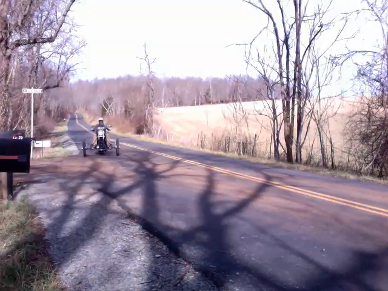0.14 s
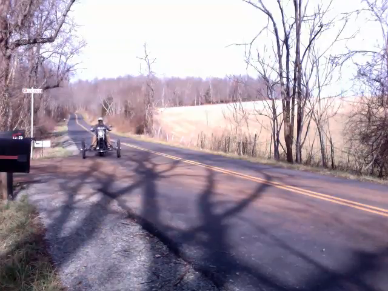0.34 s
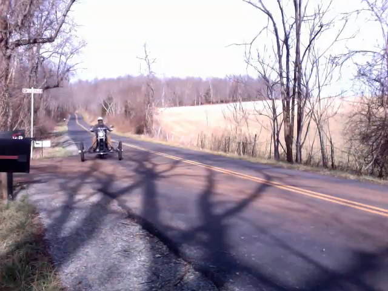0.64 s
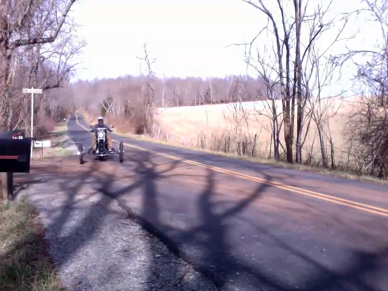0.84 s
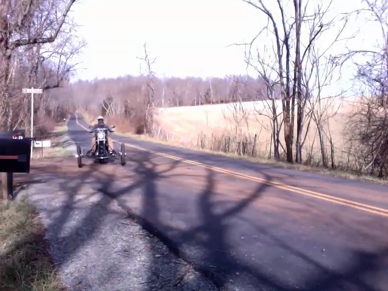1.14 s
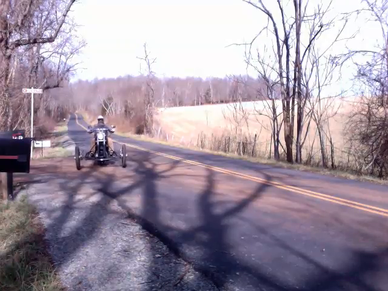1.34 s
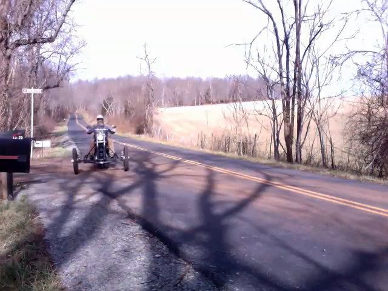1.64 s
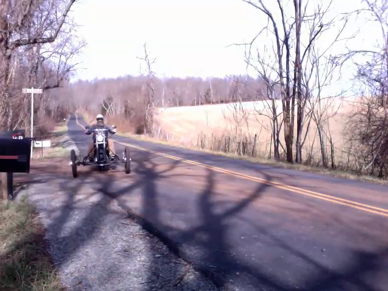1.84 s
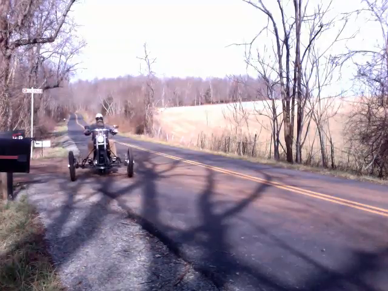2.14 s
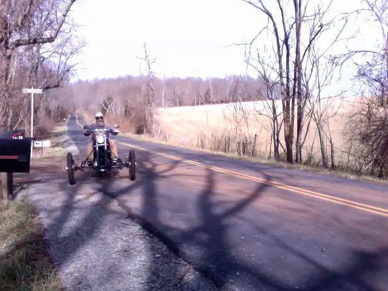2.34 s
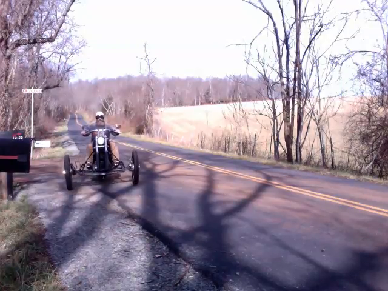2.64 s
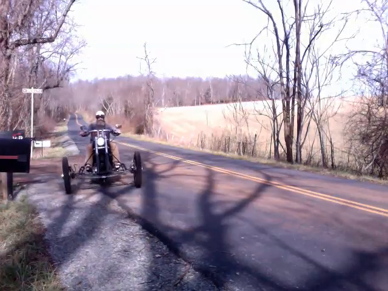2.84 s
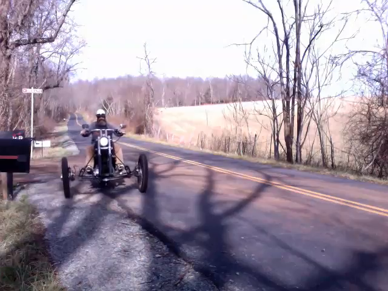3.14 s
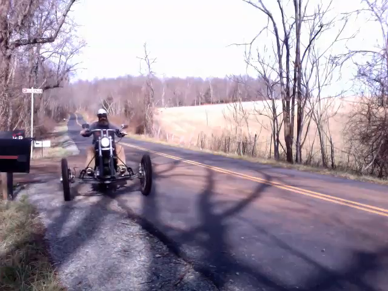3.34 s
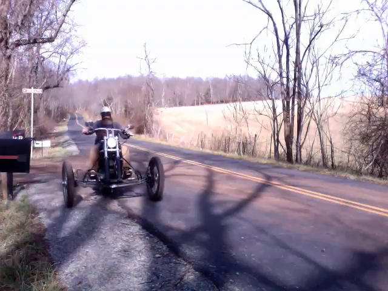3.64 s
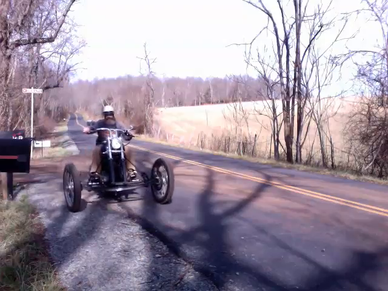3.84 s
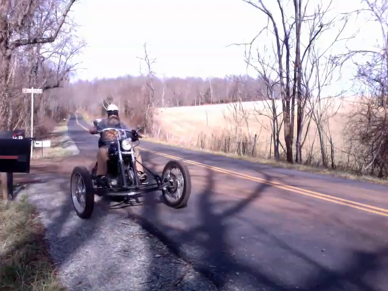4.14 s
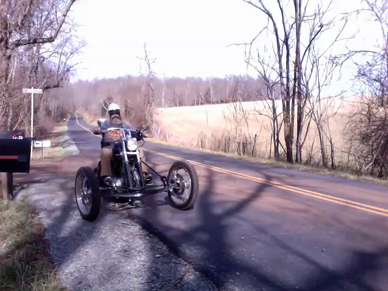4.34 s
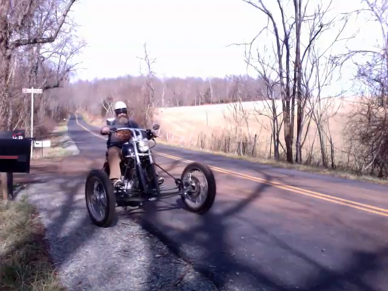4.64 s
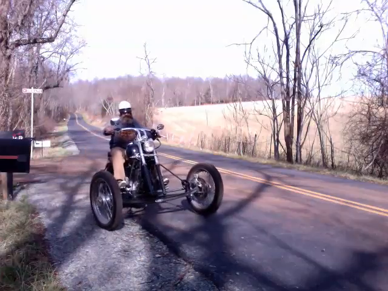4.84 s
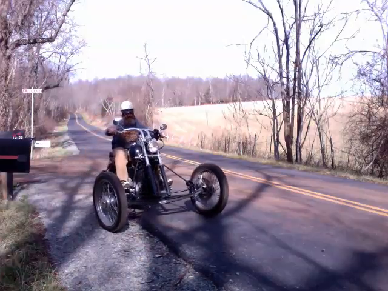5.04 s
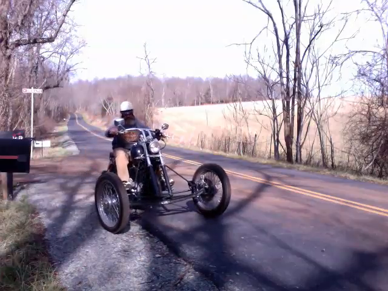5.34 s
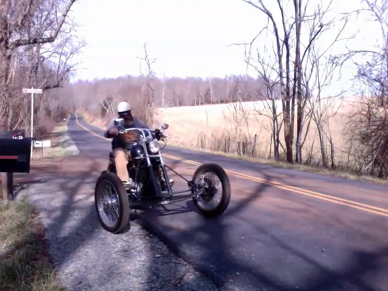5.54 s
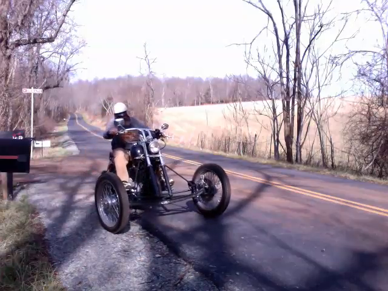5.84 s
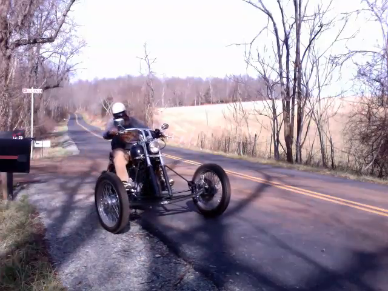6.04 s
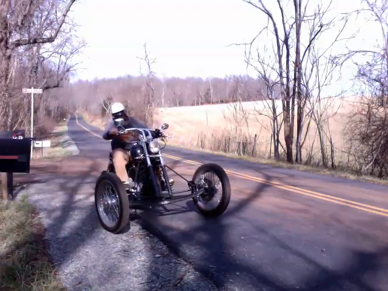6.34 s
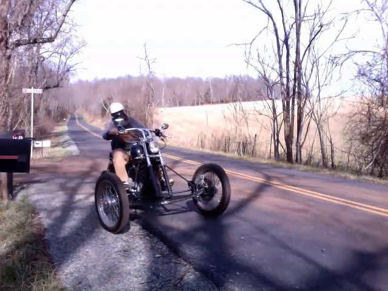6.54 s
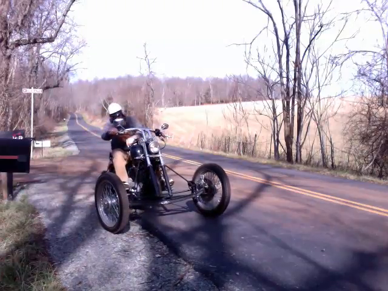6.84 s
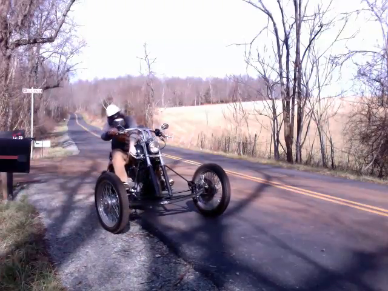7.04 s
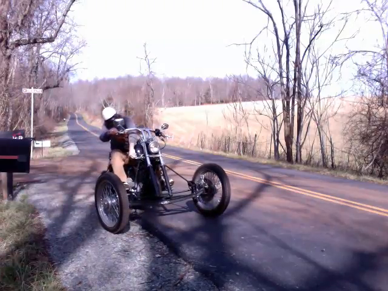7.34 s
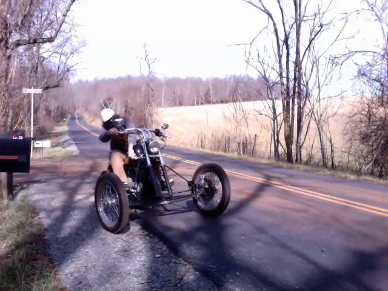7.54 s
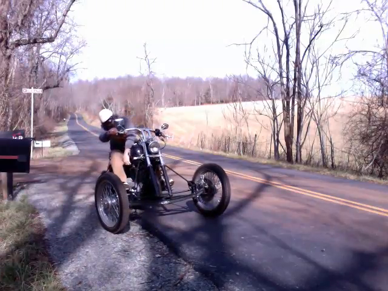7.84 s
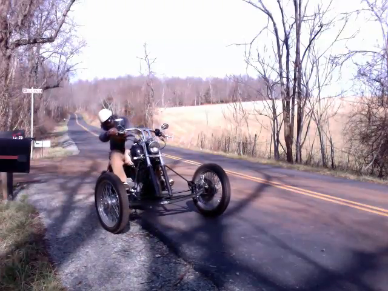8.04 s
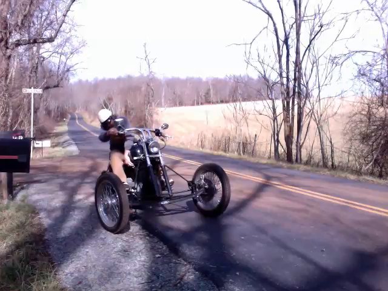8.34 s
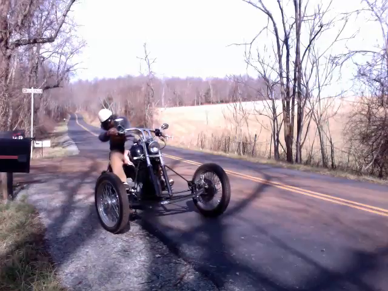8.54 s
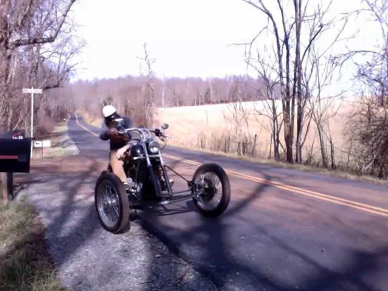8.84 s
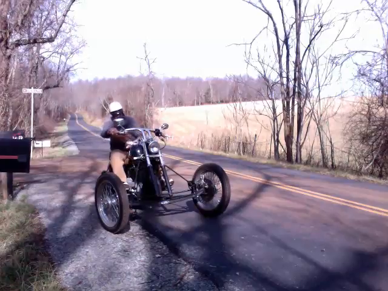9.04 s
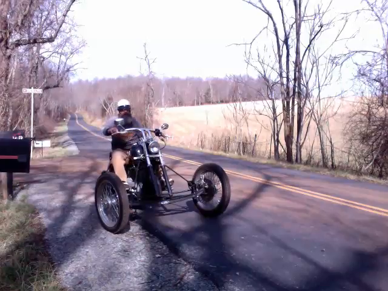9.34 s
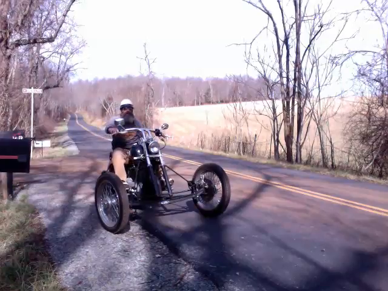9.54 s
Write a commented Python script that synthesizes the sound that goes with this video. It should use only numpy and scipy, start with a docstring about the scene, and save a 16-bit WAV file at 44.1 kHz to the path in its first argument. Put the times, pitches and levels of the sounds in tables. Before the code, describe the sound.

Heard from the side of a quiet country road, a two-cylinder motorcycle rolls nearer with a low throb and scattered pops. One loud, sharp burst of throttle follows, and the engine slows to a rapid, loping idle that echoes slightly off the trees. Then it cuts out. Small metallic ticks and a brief squeak of the frame remain in the still outdoor air.

```python
"""V-twin three-wheeler on a country road

From a roadside microphone: the motorcycle rolls up from a distance with a few bangs, blips its
throttle close by, lopes at idle and is switched off. Its two cylinders fire unevenly, each blowing a
crack of gas and a rising boom out of its open pipe. The valve gear clatters underneath and the trees
answer; in the quiet afterwards, metal ticks and the frame squeaks over a light breeze."""
import sys
import numpy as np
from scipy import signal
from scipy.fft import rfft, irfft, next_fast_len
from scipy.io import wavfile

SR = 44100
rng = np.random.default_rng(int(sys.argv[2]) if len(sys.argv) > 2 else 0)


def file_out(sig):
    """Save sig as 16-bit WAV at sys.argv[1]."""
    # one column per channel
    cols = np.atleast_2d(sig).T
    # limit, then scale
    lim = np.clip(cols, -1, 1)
    pcm = np.round(lim * 32767).astype(np.int16)
    wavfile.write(sys.argv[1], SR, pcm)


N = 427329
TIME = np.arange(N) / SR
IDLE_CYCLE_S = .125

# The engine slows up the road, is blipped, sinks to idle and runs down: time_s, cycles_per_s
ENGINE_SPEED = [(0.0, 14.932), (0.15, 17.348), (0.66, 13.134), (0.82, 12.744), (1.45, 9.081), (2.0, 8.936),
                (2.18, 6.602), (2.31, 10.37), (2.44, 9.329), (2.55, 14.866), (2.76, 21.024), (3.04, 18.448),
                (3.58, 14.444), (4.88, 8.976), (5.16, 8.215), (5.77, 8.055), (5.83, 8.569), (6.14, 7.846),
                (7.48, 7.892), (7.9, 3.897)]
# Throttle opening, 0 shut to 1 open: time_s, opening
THROTTLE = [(0, 0.2), (2.6, 0.97), (2.9, 0.08), (4, 0)]
# Gas flow, each cylinder's ordinary cracks and the rear boom, from the roadside: time_s, level_db
GAS_FLOW = [(0, -28.5), (.15, -24), (.3, -30.5), (1.2, -39), (2.2, -42), (2.55, -21), (2.77, -16.5),
            (2.84, -24.5), (3.4, -23), (5.2, -28.5), (7.45, -28.5), (7.7, -44.5), (8.3, -56.5)]
FRONT_CRACK_LEVEL = [(0, -47.5), (.07, -22.5), (.18, -20.5), (.26, -52), (.6, -40.5), (2.15, -44),
                     (2.46, -14), (2.67, -11.5), (2.76, -16.5), (2.82, -32.5), (3.9, -33.5), (4.2, -26),
                     (5.05, -20), (7.43, -21), (7.55, -36), (7.92, -54.5)]
REAR_CRACK_LEVEL = [(0, -29), (.16, -24.5), (.28, -55), (.75, -43.5), (2.42, -42.5), (2.5, -14.5),
                    (2.76, -19.5), (2.84, -50.5), (4.7, -35.5), (5.35, -21), (7.48, -23), (7.65, -61.5)]
REAR_BOOM_LEVEL = [(0, -29.5), (.85, -34), (1.25, -39.5), (1.9, -30.5), (2.2, -46.5), (2.31, -31.5),
                   (2.75, -18), (2.82, -24), (3.25, -27.5), (3.95, -25.5), (4.3, -27), (7.48, -26.5),
                   (7.8, -41.5), (8.1, -58.5)]
# Scatter between idle firings: front_crack_db, rear_crack_db, rear_boom_db
FIRING_SCATTER = [.7, .7, 2.2]
# Hard firings on the approach: start_s, level_db
BANGS = [(0.809, -30.5), (.969, -30.5), (1.056, -29), (1.145, -27.5), (1.343, -25.5), (1.389, -25),
         (1.556, -29.5), (1.667, -18), (1.826, -25.5), (1.89, -18), (2, -31), (2.056, -18.5),
         (2.258, -18.5), (2.31, -14.5), (2.362, -21.5)]
# Spells when the rear cylinder misses every other firing: start_s, end_s
MISFIRE_SPELLS = [(4.72, 7.05), (7.3, 7.4)]

# Colour of the cracks at idle and under throttle: frequency_hz, gain_db
IDLE_COLOUR = [(260, -49), (450, -19), (950, -15.5), (1490, -6.5), (2080, -12.5), (2620, -3), (4700, -10.5),
               (8170, -8.5), (14200, -13.5), (16000, -30.5)]
LOAD_COLOUR = [(240, -15), (370, 8), (580, -10), (760, -1.5), (1420, -6.5), (1900, -8.5), (2850, -1),
               (5300, 3), (7800, -3.5), (12600, -3.5), (16000, -20)]
# Upper and lower resonances of the pipes: pitch_hz, width_hz, gain_db
PIPE_MODES = [(1600, 850, 6), (2480, 360, 2.5), (3020, 130, 4), (3883, 87, -1), (4390, 380, 5),
              (5900, 180, 1.5), (6940, 170, 3), (8180, 810, 3)]
LOW_PIPE_MODES = [(348, 8.9, 6)]
# Each pipe's boom at idle, from the opening of its exhaust valve: time_s, pitch_hz, gain_db
FRONT_BOOM_GLIDE = [(0, 170, -10), (.006, 177.5, 2), (0.014, 236.5, -8.5), (0.026, 256, -2.5),
                    (.04, 330, -24.5), (0.065, 365.6, -35.5)]
REAR_BOOM_GLIDE = [(0, 76.7, -5.5), (.008, 80.8, 6), (0.021, 95.9, -3), (0.039, 122.6, 4.5),
                   (.051, 126, -10.5), (.09, 144.9, -28.5)]
# Part of a cycle for which a pipe booms: throttle_shut_share, throttle_open_share
BOOM_SHARE = [.7, .47]
# How well the open pipe ends radiate: frequency_hz, gain_db
PIPE_RADIATION = [(20, -14.5), (70, 5.5), (400, 5.5), (560, -8.5)]
# Gas churning in the pipes: frequency_hz, gain_db
CHURN_COLOUR = [(25, -30), (105, 0), (180, -4), (350, -7), (560, -24.5), (1200, -51)]
# Sharp idle firings that ring the pipe: start_s, level_db, pitch_hz
PINGS = [(5.055, -21, 2656), (5.352, -17, 3800), (6.084, -20.5, 3795), (6.28, -21.5, 2708),
         (6.404, -22, 3900), (7.171, -19, 2630)]
# Unburnt fuel rasping behind some bangs: start_s, level_db
AFTERBURNS = [(1.7, -30), (1.925, -29), (2.059, -30.5)]

# Hiss of the front exhaust valve cracking open: time_s, level_db
LEAK_LEVEL = [(0, -44), (2.8, -48), (3.5, -33.5), (7.45, -28), (7.6, -54)]
# Its colour: frequency_hz, gain_db
LEAK_COLOUR = [(1500, -29.5), (7000, 1.5), (12500, -2.5), (16000, -27.5)]
# Its whistle: pitch_hz, width_hz, gain_db
LEAK_WHISTLE = [(8260, 420, 13)]
# Clatter of valve gear and chain: time_s, level_db
CLATTER_LEVEL = [(0, -39.5), (.8, -45.5), (2.25, -49), (2.68, -30.5), (2.85, -33.5), (3.1, -36), (5.3, -47),
                 (7.45, -48.5), (7.8, -57.5), (8.4, -68)]
# Its colour: frequency_hz, gain_db
CLATTER_COLOUR = [(240, -32.5), (450, -3), (800, 3), (1420, -3.5), (2050, -3.5), (8240, -8), (12300, -11),
                  (16000, -27)]

# Last clacks of the engine, then small ticks and scuffs: start_s, level_db, pitch_hz, t60_s
TICKS = [(7.911, -49, 1810, .1), (8.243, -48, 2800, 0.16), (8.372, -52.5, 2840, 0.09),
         (8.51, -51, 2800, .03), (8.712, -50.5, 5430, 0.055), (9.139, -50.5, 3880, 0.036),
         (9.226, -40, 3770, 0.1), (9.29, -51.5, 2700, 0.19), (9.513, -50.5, 2960, 0.083),
         (9.549, -55, 2920, 0.055), (9.576, -58, 2920, 0.28)]
# The frame's thin slip and its lower, rougher one: time_s, pitch_hz, level_db
THIN_SQUEAK = [(9.172, 3710, -57.5), (9.192, 3600, -52), (9.199, 3930, -37.5), (9.216, 4065, -35.5),
               (9.224, 3970, -47)]
LOW_SQUEAK = [(9.2, 1290, -64), (9.22, 1210, -43.5), (9.246, 1206, -53)]
# Gas seeping from the stopped engine: time_s, level_db
SEEP_LEVEL = [(7.7, -88), (8.45, -72), (8.8, -90)]
# Its colour: frequency_hz, gain_db
SEEP_COLOUR = [(1000, -16), (6000, -7)]
# Its whistle: pitch_hz, width_hz, gain_db
SEEP_WHISTLE = [(9240, 630, 17)]

# The close reflection, weaker once the motorcycle is side on to the microphone: time_s, gain
CLOSE_ECHO = [(4, .34), (4.7, .18)]
# Decay among the roadside trees: frequency_hz, t60_s
TREE_DECAY = [(200, 1), (2500, 1), (16000, 0.12)]
# Open country air, and wind on the microphone: frequency_hz, gain_db
AIR_COLOUR = [(53, -36.5), (90, -5), (316, -7), (915, -7.5), (9110, -27), (16000, -50.5)]
WIND_COLOUR = [(15, 9.5), (35, -9), (100, -53)]


def amp(db):
    """Decibels to gain."""
    return 10 ** (np.asarray(db) / 20)


def unit_rms(x):
    """Scales to rms 1."""
    return x / np.sqrt(np.mean(x ** 2) + 1e-20)


def curve(rows, t=TIME):
    """Reads every column of a time table at the times t."""
    times, *columns = np.transpose(rows)
    return [np.interp(t, times, column) for column in columns]


def at_frequency(points, hz):
    """Reads a spectrum on a log-frequency axis."""
    points_hz, value = np.transpose(points)
    return np.interp(np.log(hz + 1), np.log(points_hz + 1), value)


def add(mix, start_s, sound):
    """Mixes a sound in at start_s."""
    start = round(start_s * SR)
    sound = sound[max(-start, 0):]
    part = mix[max(start, 0):][:len(sound)]
    part += sound[:len(part)]


def coloured(x, spectrum, modes=(), size=8192):
    """Minimum-phase filter that keeps the power: a broad spectrum with resonances standing on it."""
    hz = np.fft.rfftfreq(size, 1 / SR)
    peaks_db = sum(height / (1 + (2 * (hz - pitch) / width) ** 2) for pitch, width, height in modes)
    log_gain = np.log(amp(at_frequency(spectrum, hz) + peaks_db))
    mirrored = np.concatenate([log_gain, log_gain[-2:0:-1]])
    taps = np.fft.ifft(np.exp(np.conj(signal.hilbert(mirrored)))).real
    return unit_rms(signal.oaconvolve(x, taps)[:N]) * np.sqrt(np.mean(x ** 2))


def noise(spectrum):
    """Steady noise of rms 1 with the given spectrum."""
    size = next_fast_len(N)
    gain = amp(at_frequency(spectrum, np.fft.rfftfreq(size, 1 / SR)))
    return unit_rms(irfft(rfft(rng.standard_normal(size)) * gain, size)[:N])


def wander(hz):
    """Smooth random motion of rms 1, about hz changes a second."""
    return unit_rms(np.interp(TIME * hz, np.arange(N), rng.standard_normal(N)))


def firing_times(first_cycles=.11, rear_lag_cycles=.468, standstill_s=8):
    """Front and rear firing times and cycle lengths in seconds, following the engine speed."""
    turns = np.cumsum(curve(ENGINE_SPEED)[0]) / SR
    front = np.interp(np.arange(first_cycles, np.interp(standstill_s, TIME, turns)), turns, TIME)
    cycles = np.diff(front)
    cycles = np.append(cycles, 1.9 * cycles[-1])  # the final cycle crawls
    firings = np.concatenate([front, front + rear_lag_cycles * cycles])
    for start_s, _ in BANGS:
        firings[np.argmin(abs(firings - start_s))] = start_s  # the nearest firing becomes the bang
    return *np.split(firings, 2), cycles


def firing_levels(miss_crack_db=-29.5, miss_boom_db=-9):
    """Front crack, rear crack and rear boom of each cycle in dB: uneven, with misses and bangs."""
    front, rear, cycles = firing_times()
    unsteadiness = np.minimum(cycles / IDLE_CYCLE_S, 1) ** 2  # steadier at speed
    scatter_db = (FIRING_SCATTER * rng.standard_normal((len(front), 3))).T * unsteadiness
    missed = np.zeros(len(rear))
    for start_s, end_s in MISFIRE_SPELLS:
        missed[np.flatnonzero((rear > start_s) & (rear < end_s))[::2]] = 1
    front_db = curve(FRONT_CRACK_LEVEL, front)[0] + scatter_db[0]
    rear_db = curve(REAR_CRACK_LEVEL, rear)[0] + scatter_db[1] + miss_crack_db * missed
    crack_db = np.concatenate([front_db, rear_db])
    for start_s, level_db in BANGS:
        crack_db[np.argmin(abs(np.concatenate([front, rear]) - start_s))] = level_db
    boom_db = curve(REAR_BOOM_LEVEL, rear)[0] + scatter_db[2] + miss_boom_db * missed
    return *np.split(crack_db, 2), boom_db


def jet_envelope(times, levels_db, cycles, rise_s, hold_s, fall_s, tail_db, tail_s):
    """At each valve opening the jet swells, holds, collapses and scatters off the road."""
    t, out = np.arange(-SR // 50, SR // 10) / SR, np.zeros(N)
    for start_s, level_db, cycle_s in zip(times, levels_db, cycles):
        length = min(cycle_s / IDLE_CYCLE_S, 1) ** 0.3  # a faster engine makes shorter cracks
        half_hold = hold_s / 2 * length
        before, after = np.minimum(t + half_hold, 0), np.maximum(t - half_hold, 0)
        swell = np.exp(-(before / rise_s) ** 2)
        decay = np.exp(-after / (fall_s * length)) + amp(tail_db) * np.exp(-after / tail_s)
        add(out, start_s + t[0], amp(level_db) * swell * decay)
    return out


def exhaust_cracks(front_db, rear_db, gain_db=-1.44, ragged_db=2, heat_spread=0.049, burn_kinds=6):
    """Turbulent jets ring the pipes' upper resonances; at idle the rear one is duller."""
    front, rear, cycles = firing_times()
    gas = rng.standard_normal(N) * unit_rms(amp(ragged_db * wander(900)))
    front_jet = gas * jet_envelope(front, front_db, cycles, rise_s=0.0036, hold_s=0.0035,
                                   fall_s=0.0053, tail_db=-24.5, tail_s=0.15)
    rear_jet = gas * jet_envelope(rear, rear_db, cycles, rise_s=0.0035, hold_s=0.0023,
                                  fall_s=0.0056, tail_db=-28, tail_s=0.0037)
    dull_rear = signal.sosfilt(signal.butter(1, 5500, fs=SR, output="sos"), rear_jet)
    throttle = np.clip(curve(THROTTLE)[0], 0, 1)
    # Idle firings burn differently: each kind favours some resonances, and its heat shifts them.
    cycle_index = np.searchsorted(front[1:] - cycles[:-1] / 10, TIME)
    kind = rng.integers(0, burn_kinds, len(front))[cycle_index]
    hz, width, height = np.transpose(PIPE_MODES)
    favour = rng.uniform(0, 2.3, (burn_kinds, len(hz)))
    shift = 1 + heat_spread * rng.standard_normal(burn_kinds)
    idle_jet = (front_jet + dull_rear) * np.sqrt(1 - throttle)
    idle = sum(coloured(idle_jet * (kind == k), IDLE_COLOUR,
                        zip(hz * shift[k], width, height * favour[k])) for k in range(burn_kinds))
    load = coloured((front_jet + rear_jet) * np.sqrt(throttle), LOAD_COLOUR, PIPE_MODES)
    return amp(gain_db) * (idle + load)


def booms(times, levels_db, cycles, glide, lead_s, shrink, heat, overtone, overtone_db, bark_db, waver):
    """Pipe and open cylinder ring until the valve shuts; the note climbs as the piston rises."""
    t, out = np.arange(SR // 8) / SR, np.zeros(N)
    fade = np.linspace(1, 0, len(t)) ** .2
    chances = rng.standard_normal(len(times))
    for start_s, level_db, cycle_s, chance in zip(times, levels_db, cycles, chances):
        speed = np.clip(IDLE_CYCLE_S / cycle_s, .7, 3)
        hz, shape_db = curve(glide, t * speed ** shrink)
        hz = hz.max() * (hz / hz.max()) ** (speed ** -.55)  # the climb is shallower at speed
        throttle = curve(THROTTLE, start_s)[0]
        revving = throttle * np.log2(speed)
        sharpening = 1 + 0.071 * revving + waver * chance / speed
        phase = 2 * np.pi * np.cumsum(hz * speed ** heat * sharpening) / SR  # hotter gas rings higher
        ring = np.sin(phase) + amp(overtone_db + bark_db * revving) * np.sin(overtone * phase)
        open_s = np.interp(throttle, [0, 1], BOOM_SHARE) * cycle_s
        valve = 1 / (1 + (t / open_s) ** 8)
        add(out, start_s - lead_s, amp(level_db + shape_db) * ring * valve * fade)
    return out


def thumps(times, levels_db, delay_s, width_s):
    """A slug of gas leaves the pipe just behind each crack: one short push."""
    t, out = np.arange(-SR // 50, SR // 50) / SR, np.zeros(N)
    push = (1 - 2 * (t / width_s) ** 2) * np.exp(-(t / width_s) ** 2)
    for start_s, level_db in zip(times, levels_db):
        add(out, start_s + delay_s + t[0], amp(level_db) * push)
    return out


def pipe_rumble(front_crack_db, rear_crack_db, rear_boom_db, crack_share=0.91, churn_db=-16):
    """Both pipes thump and boom in turn over churning gas; a harder firing thumps harder."""
    front, rear, cycles = firing_times()
    flow_db = curve(GAS_FLOW, front)[0]
    surplus_db = front_crack_db - curve(FRONT_CRACK_LEVEL, front)[0]  # above an ordinary firing
    front_boom = booms(front, flow_db + 0.5 * surplus_db, cycles, FRONT_BOOM_GLIDE, lead_s=0.0014,
                       shrink=-0.017, heat=0.11, overtone=1.65, overtone_db=-11.5,
                       bark_db=-1.5, waver=0.061)
    rear_boom = booms(rear, rear_boom_db, cycles, REAR_BOOM_GLIDE, lead_s=0.00461,
                      shrink=0.48, heat=-0.065, overtone=3.1, overtone_db=-16.5,
                      bark_db=12, waver=0.059)
    front_push_db = flow_db + crack_share * (front_crack_db - flow_db)
    rear_push_db = flow_db + crack_share * (rear_crack_db - flow_db)
    pushes = thumps(front, front_push_db, delay_s=0.0027, width_s=0.004)
    pushes += thumps(rear, rear_push_db, delay_s=0.0038, width_s=0.0018)
    pushes *= amp(-10 * curve(THROTTLE)[0])  # with the throttle open the gas flows more evenly
    # Above idle the churning fills the gaps between booms.
    doublings = np.maximum(np.log2(curve(ENGINE_SPEED)[0] * IDLE_CYCLE_S), 0)
    churn = noise(CHURN_COLOUR) * amp(curve(GAS_FLOW)[0] + churn_db + 4.5 * doublings)
    pulses = amp(1.15) * front_boom + amp(0.27) * rear_boom + amp(-2) * pushes
    return coloured(pulses, PIPE_RADIATION, LOW_PIPE_MODES) + churn


def pipe_pings(rise_s=0.0028, fall_s=0.0026, shared_hz=2960, shared_db=-4):
    """A sharp firing clanks the pipe on two notes: its own, and one that all the pings share."""
    t, out = np.arange(-SR // 100, SR // 20) / SR, np.zeros(N)
    swell = np.exp(-(np.minimum(t, 0) / rise_s) ** 2 - np.maximum(t, 0) / fall_s)
    flutter = 1 + 0.012 * wander(1000)
    for start_s, level_db, pitch_hz in PINGS:
        phase_per_hz = 2 * np.pi * np.cumsum(flutter[round(start_s * SR):][:len(t)]) / SR
        ring = np.sin(pitch_hz * phase_per_hz) + amp(shared_db) * np.sin(shared_hz * phase_per_hz)
        add(out, start_s + t[0], amp(level_db) * swell * ring)
    return out


def afterburns(rise_s=0.0062, fall_s=0.019, ragged_db=3):
    """Late burning gas makes a soft, ragged rasp in the pipe."""
    t, flow = np.arange(SR // 6) / SR, np.zeros(N)
    flare = np.minimum(t / rise_s, 1) * np.exp(-np.maximum(t - rise_s, 0) / fall_s)
    for start_s, level_db in AFTERBURNS:
        add(flow, start_s, amp(level_db) * flare)
    gas = rng.standard_normal(N) * unit_rms(amp(ragged_db * wander(460)))
    return coloured(flow * gas, LOAD_COLOUR, PIPE_MODES)


def valve_leak(lead_s=0.0027):
    """A thin, bright spit of gas runs just ahead of each front crack."""
    front, _, cycles = firing_times()
    flow = jet_envelope(front - lead_s, curve(LEAK_LEVEL, front)[0], cycles, rise_s=0.0021,
                        hold_s=0.0016, fall_s=0.0011, tail_db=-10, tail_s=0.02)
    return coloured(flow * rng.standard_normal(N), LEAK_COLOUR, LEAK_WHISTLE)


def valve_gear(rattle_db=2.5, knocks_per_s=45, knock_s=0.0036, tappet_gain=0.53):
    """Gears and chain knock at random, a tappet clicks as each valve opens, and the case rings."""
    blows = (rng.random(N) < knocks_per_s / SR) * np.minimum(rng.exponential(1, N), 2)
    front, rear, _ = firing_times()
    for times, share in (front, 1), (rear, .5):
        for start_s, force in zip(times, rng.uniform(0.17, 0.97, len(times))):
            add(blows, start_s, np.array([tappet_gain * share * force]))
    knocks = signal.lfilter([1], [1, -np.exp(-1 / (knock_s * SR))], blows)
    shaking = unit_rms(amp(rattle_db * wander(180)) + knocks) * rng.standard_normal(N)
    case_mode = (2760, 140, 4)  # pitch_hz, width_hz, gain_db
    rattle = coloured(shaking, CLATTER_COLOUR, PIPE_MODES + [case_mode])
    turning = np.interp(TIME, [7.9, 8.5], [1, 0])
    return rattle * amp(curve(CLATTER_LEVEL)[0]) * turning


def metal_ticks(width_hz=330, contact_db=-10, contact_edge_hz=7000, rise_s=0.0011):
    """Hot metal and the controls tick and scuff as the engine comes to rest and the rider sits up."""
    t, out = np.arange(SR // 5) / SR, np.zeros(N)
    radius = np.exp(-np.pi * width_hz / SR)
    lowpass = signal.butter(2, contact_edge_hz, fs=SR, output="sos")
    for start_s, level_db, pitch_hz, t60_s in TICKS:
        grain = rng.standard_normal(len(t))
        resonator = [1, -2 * radius * np.cos(2 * np.pi * pitch_hz / SR), radius ** 2]
        ring = unit_rms(signal.lfilter([1, 0, -1], resonator, grain))
        contact = unit_rms(signal.sosfilt(lowpass, grain))
        envelope = np.minimum(t / rise_s, 1) * np.exp(-np.log(1000) * t / t60_s)
        add(out, start_s, amp(level_db) * (ring + amp(contact_db) * contact) * envelope / 2)
    return out


def frame_squeak(glide, roughness, harmonics_db, third_slip=0):
    """A joint sticks and slips as the rider sits up; every third slip may be stronger."""
    hz, level_db = curve(glide)
    phase = 2 * np.pi * np.cumsum(hz * (1 + roughness * wander(1200))) / SR
    tone = sum(amp(db) * np.sin(k * phase) for k, db in enumerate(harmonics_db, 1))
    tone *= 1 + third_slip * np.cos(phase / 3)
    sounding = (TIME > glide[0][0]) & (TIME < glide[-1][0])
    return np.sqrt(2) * amp(level_db) * tone * sounding


def seeping_gas(waver_db=3):
    """Gas leaves the stopped engine in a faint hiss that swells, wavers and fades."""
    sounding = (TIME > SEEP_LEVEL[0][0]) & (TIME < SEEP_LEVEL[-1][0])
    level_db = curve(SEEP_LEVEL)[0] + waver_db * wander(20)
    return coloured(rng.standard_normal(N), SEEP_COLOUR, SEEP_WHISTLE) * amp(level_db) * sounding


def close_reflection(x, notch_spacing_hz=1358):
    """One very close reflection cuts evenly spaced notches, so the engine sounds hollow."""
    size = next_fast_len(N)
    delay = np.exp(-2j * np.pi * np.fft.rfftfreq(size, 1 / SR) / notch_spacing_hz)
    return x + curve(CLOSE_ECHO)[0] * irfft(rfft(x, size) * delay, size)[:N]


def distance(x, far_share=0.43, edge_hz=6500):
    """Air and ground dull the treble while the motorcycle is still far from the microphone."""
    dull = signal.sosfiltfilt(signal.butter(2, edge_hz, fs=SR, output="sos"), x)
    return x + np.interp(TIME, [1.3, 2.4], [far_share, 0]) * (dull - x)


def tree_echo(x, onset_s=0.0054, echoes_per_s=2000):
    """Trunks along the road scatter a thin, late tail back to the microphone."""
    echoes = rng.standard_normal(SR) * (rng.random(SR) < echoes_per_s / SR)
    hz, t, bands = signal.stft(echoes, SR, nperseg=256)
    t60_s = at_frequency(TREE_DECAY, hz)[:, None]
    envelope = np.exp(-np.log(1000) * t / t60_s) * (1 - np.exp(-t / onset_s))
    tail = signal.istft(bands * envelope, SR, nperseg=256)[1]
    return signal.oaconvolve(x, tail / np.linalg.norm(tail))[:N]


def country_air(air_db=-69.5, wind_db=-47, gust_db=3, hum_hz=318, hum_db=-73):
    """Quiet open air, a breeze on the microphone and a faint hum far off."""
    air = noise(AIR_COLOUR)
    highpass = signal.butter(4, 100, "high", fs=SR, output="sos")
    air /= np.std(signal.sosfilt(highpass, air))  # air_db is the level above 100 Hz
    wind = noise(WIND_COLOUR) * amp(wind_db + gust_db * wander(6))
    hum = np.sqrt(2) * np.sin(2 * np.pi * np.cumsum(hum_hz + 8 * wander(24)) / SR)
    hum_fade = np.interp(TIME, [8.9, 9.4], [1, .4])
    return amp(air_db) * air + wind + amp(hum_db) * hum * hum_fade


def scene(trees_db=-21):
    """The motorcycle, the trees and the open air at one roadside microphone."""
    front_db, rear_db, rear_boom_db = firing_levels()
    exhaust = exhaust_cracks(front_db, rear_db) + pipe_pings() + valve_leak() + afterburns()
    exhaust += pipe_rumble(front_db, rear_db, rear_boom_db)
    engine = distance(close_reflection(exhaust + valve_gear()))
    squeaks = frame_squeak(THIN_SQUEAK, roughness=.009, harmonics_db=[0, -24, -23], third_slip=0.089)
    squeaks += frame_squeak(LOW_SQUEAK, roughness=0.048, harmonics_db=[-1.5, -11, -16])
    settling = metal_ticks() + squeaks + seeping_gas()
    echo = amp(trees_db) * tree_echo(engine + 0.59 * settling)
    return (engine + settling + echo + country_air())[None]


def record(dry, overload_peak=.75, edge_hz=16100):
    """The microphone rounds off the hardest cracks, then the top of the treble is cut."""
    rounded = dry / (1 + (dry / overload_peak) ** 6) ** (1 / 6)
    lowpass = signal.firwin(511, edge_hz, window=("kaiser", 9), fs=SR)
    return signal.oaconvolve(rounded, lowpass[None], "same")


dry = scene()
out = record(dry)
file_out(out)
```